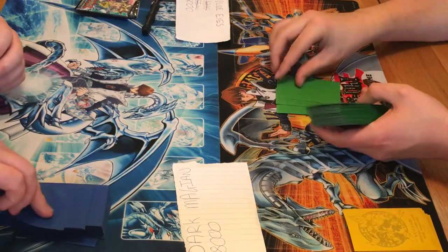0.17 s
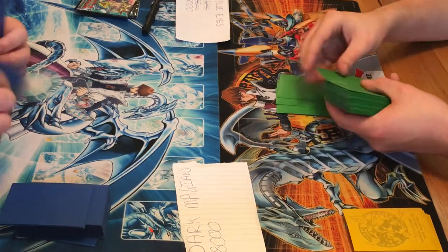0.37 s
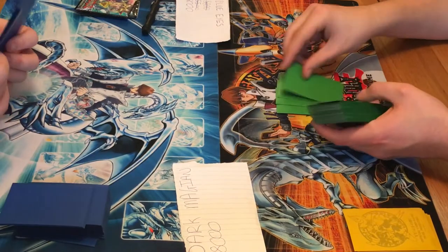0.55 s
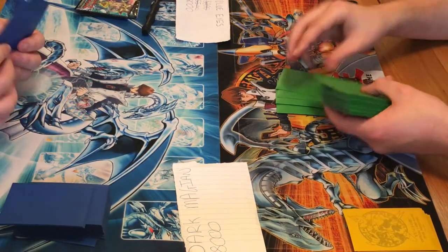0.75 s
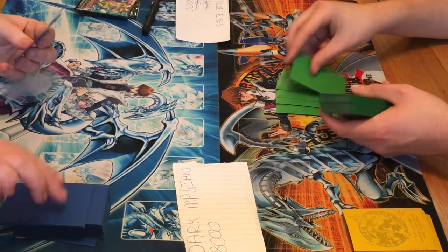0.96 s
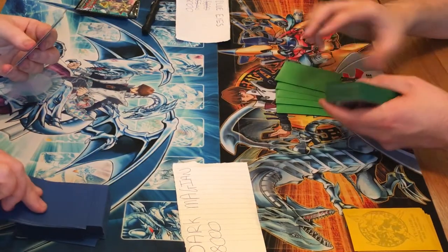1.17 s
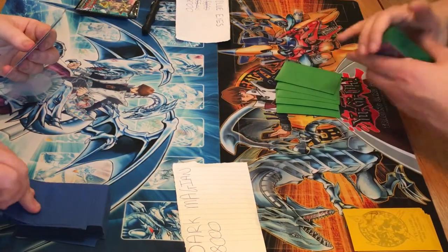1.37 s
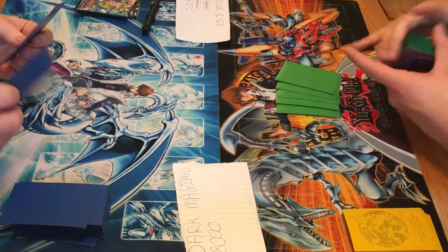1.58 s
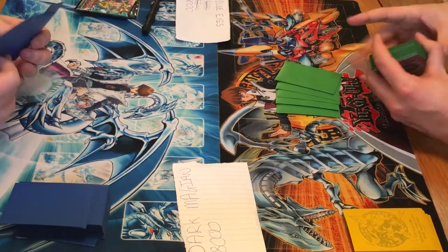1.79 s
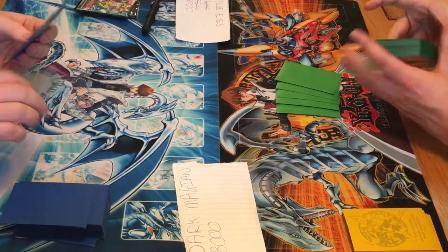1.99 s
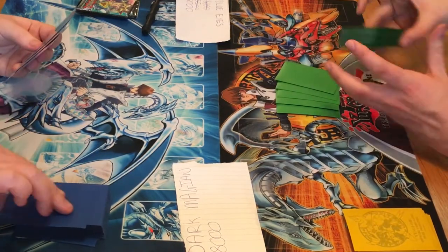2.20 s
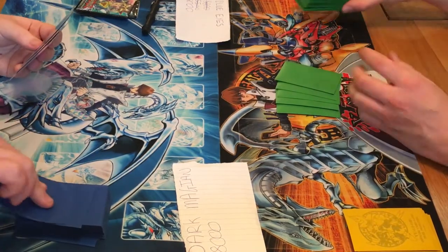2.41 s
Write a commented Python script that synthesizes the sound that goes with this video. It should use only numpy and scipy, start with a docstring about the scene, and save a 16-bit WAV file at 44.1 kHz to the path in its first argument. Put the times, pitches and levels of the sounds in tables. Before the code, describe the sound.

Plastic-sleeved cards slide and snap flat on a mat, sharply at first, then a card is drawn off a pile with a quick zip, followed by faint taps over quiet room noise and low hum.

```python
"""A small live room: sleeved playing cards are dealt onto a cloth mat on a wooden table, one microphone. Cards
slide with grainy friction noise, then touch down and snap flat as smeared pulses with a plastic crackle. Sleeve
edges zip in short bright noise; a short squeak and a drawn card are stick-slip bursts in narrow bands. Low
thuds of the table are damped low modes, over room noise and a wavering hum."""
import sys
import numpy as np
from scipy import signal
from scipy.fft import rfft, irfft, next_fast_len
from scipy.io import wavfile
from scipy.ndimage import map_coordinates

SR = 44100
rng = np.random.default_rng(int(sys.argv[2]) if len(sys.argv) > 2 else 0)


def transcribe(u):
    """Save the signal u as a 16-bit wav file named by the first command-line argument.

    u: samples, shape (n,) or (channels, n), limited to [-1, 1]; the rate is SR.
    q: integer samples, one column per channel.
    """
    v = np.clip(np.atleast_2d(u).T, -1, 1)
    q = np.round(v * 32767).astype(np.int16)
    wavfile.write(sys.argv[1], SR, q)


N = 108045  # length in samples
TOP_HZ = 16100  # upper band limit

# colour of a sleeve rubbing: (frequency [Hz], level [dB])
SLEEVE_HISS = [(1500, -21.5), (4000, -13.5), (5800, -6), (7500, -12), (9500, -1), (10700, -5), (12400, 4.5),
               (14000, -1), (16000, -7.5)]


def amp(db):
    """Decibels to gain."""
    return 10 ** (np.asarray(db) / 20)


def unit(x):
    """Scale to rms 1."""
    return x / np.sqrt(np.mean(x ** 2) + 1e-20)


def along(points, hz):
    """Read (Hz, value) points on a log frequency axis."""
    f, value = np.transpose(points)
    return np.interp(np.log(hz + 1), np.log(f + 1), value)


def filtered(x, response):
    """Multiply the spectrum of x by a response of frequency."""
    size = next_fast_len(len(x) + 8192)
    hz = np.fft.rfftfreq(size, 1 / SR)
    return irfft(rfft(x, size) * response(hz), size)[:len(x)]


def noise(spectrum, size):
    """Coloured noise of rms 1."""
    white = rng.standard_normal(size)
    return unit(filtered(white, lambda hz: amp(along(spectrum, hz))))


def wobble(rate):
    """A smooth random curve, rate knots a second."""
    knots = rng.standard_normal(N // 8)
    return map_coordinates(knots, [np.arange(N) * rate / SR], mode="wrap")


def ring(modes, t):
    """Damped modes struck at t = 0."""
    return sum(amp(db - 60 * t / t60) * np.sin(2 * np.pi * hz * t) for hz, db, t60 in modes)


def add(track, s, x):
    """Mix x into the track at time s."""
    i = max(round(s * SR), 0)
    track[i:i + len(x)] += x[:max(N - i, 0)]


def in_room(x, room_db):
    """The direct sound and a diffuse tail that builds up, then dies faster in the treble."""
    # ringing time of the room: (frequency [Hz], t60 [s])
    room_t60 = [(150, 0.55), (500, 0.38), (1200, 0.38), (3000, 0.38), (7000, 0.33), (14000, 0.26)]
    # colour of the tail: (frequency [Hz], level [dB])
    room_colour = [(100, 0.5), (400, 4.5), (1200, -1), (3000, -1), (5000, -3), (9000, -4.5), (15000, -8)]
    build_s = 0.0046
    hz, t, bins = signal.stft(rng.standard_normal(SR * 2 // 3), SR, nperseg=256)
    decay = amp(-60 * t / along(room_t60, hz)[:, None])
    tail = signal.istft(bins * decay, SR, nperseg=256)[1]
    tail_t = np.arange(len(tail)) / SR
    tail = tail * (1 - np.exp(-(tail_t / build_s) ** 2))
    tail = filtered(tail / np.linalg.norm(tail), lambda f: amp(along(room_colour, f)))
    return x + amp(room_db) * signal.fftconvolve(x, tail)[:len(x)]


def click(parts):
    """One causal pulse from (spectrum, energy dB) parts: bending waves in the card smear it over a few cycles."""
    spread_hz, spread_width_hz = 3270, 1850
    settle_s = 0.0009  # extra delay at TOP_HZ, growing in proportion to frequency
    hz = np.fft.rfftfreq(1024, 1 / SR)
    power = sum((amp(db) * unit(amp(along(spectrum, hz)))) ** 2 for spectrum, db in parts)
    # folding the cepstrum gives minimum phase: the energy comes as early as it can
    cepstrum = irfft(np.log(power) / 2)
    fold = 1 + np.sign(len(cepstrum) // 2 - np.arange(len(cepstrum)))
    fold[0] = 1
    # all-pass phase lag [radians]: delays, but leaves the colour alone
    bending_lag = 2 * np.arctan2(hz * spread_width_hz, spread_hz ** 2 - hz ** 2)
    treble_lag = np.pi * settle_s * hz ** 2 / TOP_HZ
    return irfft(np.exp(rfft(cepstrum * fold) - 1j * (bending_lag + treble_lag)))


def snaps():
    """A bent card springs flat: one pulse of flex and knock, a brief plastic crackle, reflected by the table top."""
    # card edges snapping or tapping down:
    # (time [s], card flex [dB], knock on the mat [dB], sleeve crack [dB], room tail before its colour [dB])
    touches = [(0.1797, -35, -28, -30.5, 8.5), (0.2412, -4.5, -17, -15.5, 0.5),
               (0.5978, -30, -21.5, -26, 4), (0.6576, -15.5, -21, -17.5, -0.5),
               (0.9408, -37.5, -35.5, -42, -1), (1.0388, -34, -30, -30, 0), (1.047, -55, -40, -56, 7),
               (1.0809, -29.5, -18, -20, 0.5), (1.6485, -42, -42, -34, 1), (1.657, -49, -44, -27, -3),
               (1.8041, -48, -36, -40, 2.5), (2.0553, -43.5, -54, -41.5, 0), (2.273, -46, -46.5, -55, 9.5),
               (2.389, -46, -41.5, -44, 11.5)]
    # colours of a bent card, of cards on the mat and of a plastic sleeve: (frequency [Hz], level [dB])
    flex = [(300, -61), (1000, -10), (1900, -3.5), (2550, 1), (3350, 2), (4000, -6), (5200, -16.5),
            (7000, -35), (16000, -51)]
    knock = [(80, -7), (200, -6.5), (450, -8), (1000, -1.5), (1900, -4.5), (3000, -10.5), (6000, -13),
             (16000, -65)]
    crack = [(300, -1), (1500, -5), (4200, -4), (6300, 2), (9000, -0.5), (10300, -4), (13000, 2.5),
             (16000, -1.5)]
    crack_t60_s = 0.014
    edge_db = -1.5  # the sleeve's first sharp contact against its crackle
    bounce_s, bounce_db = 0.0015, -12
    out = np.zeros(N)
    t = np.arange(SR * 2 // 3) / SR
    for s, flex_db, knock_db, crack_db, room_db in touches:
        pulse = click([(flex, flex_db), (knock, knock_db), (crack, crack_db + edge_db)])
        crackle = noise(crack, size=len(t)) * amp(-60 * t / crack_t60_s)
        crackle = crackle / np.linalg.norm(crackle)
        hit = np.pad(pulse, (0, len(t) - len(pulse))) + amp(crack_db) * crackle
        add(out, s, in_room(hit, room_db))
        add(out, s + bounce_s, amp(bounce_db) * hit)
    return out


def stroke(s, rise, fall):
    """Friction of one stroke: it swells exponentially to a peak at s, then fades."""
    t = np.arange(N) / SR
    return np.exp(-np.where(t < s, (s - t) / rise, (t - s) / fall))


def slips():
    """Uneven stick-slip bursts, a gain of rms 1."""
    slips_per_s, slip_db = 230, 4.5
    return unit(amp(slip_db * np.tanh(wobble(slips_per_s))))


def slides():
    """Grainy friction swells as a card speeds up and fades as it comes free; the rasp comes in small rubs."""
    # cards sliding: (time of the peak [s], rise [s], fall [s], sleeve hiss [dB], card rasp [dB])
    strokes = [(.005, 0.014, 0.044, -64.5, -61.5), (0.096, 0.0068, 0.017, -60, -60),
               (0.154, 0.027, 0.025, -63, -58), (0.235, 0.012, 0.03, -49, -49.5),
               (0.389, 0.018, 0.0055, -43.5, -56), (0.508, 0.026, 0.018, -60.5, -60),
               (.558, 0.009, 0.012, -53.5, -57), (0.641, 0.049, 0.017, -59.5, -53),
               (0.739, 0.012, 0.009, -58, -52.5), (0.849, 0.022, 0.036, -65, -62.5),
               (0.96, 0.016, 0.026, -59, -55), (1.043, 0.0092, 0.021, -60, -55),
               (1.325, 0.059, 0.023, -65.5, -91), (1.404, 0.018, 0.019, -63, -61.5),
               (1.502, 0.033, 0.016, -64, -76), (1.577, 0.021, 0.0059, -45, -56),
               (1.657, 0.029, 0.018, -55.5, -64), (1.910, .04, 0.051, -68.5, -79.5),
               (2.289, 0.022, 0.0083, -80, -66), (2.415, 0.022, 0.056, -68, -69)]
    # colour of card on card: (frequency [Hz], level [dB])
    card_rasp = [(150, -3), (600, -10.5), (1300, -2), (2500, -1.5), (4200, -8), (7500, -9.5),
                 (16000, -17.5)]
    grains_per_s, grain_db, room_db = 450, 2, -2
    hiss_level, rasp_level = np.zeros(N), np.zeros(N)
    for s, rise, fall, hiss_db, rasp_db in strokes:
        speed = stroke(s, rise, fall)
        hiss_level += amp(hiss_db) * speed
        rasp_level += amp(rasp_db) * speed
    grain = unit(amp(grain_db * np.tanh(wobble(grains_per_s))))
    hiss = hiss_level * noise(SLEEVE_HISS, size=N)
    rasp = rasp_level * slips() * noise(card_rasp, size=N)
    return in_room(grain * (hiss + rasp), room_db)


def zips():
    """A sleeve edge zips past another: very short bright scrapes of noise."""
    # edges passing: (time [s], level [dB])
    edges = [(0.2356, -46), (0.238, -42), (0.6555, -37), (0.742, -45), (1.025, -53.5), (1.0758, -33.5),
             (1.4897, -39.5)]
    width_s, room_db = 0.0014, -0.5
    t = np.arange(N) / SR
    level = sum(amp(db) * np.exp(-((t - s) / width_s) ** 2) for s, db in edges)
    return in_room(level * noise(SLEEVE_HISS, size=N), room_db)


def squeak_and_draw():
    """A short squeak, then a card pulled off the pile: stick-slip bursts of noise, each in its own band."""
    # a short squeak, then a card scraped off the pile, ringing its sleeve:
    # (time of the peak [s], rise [s], fall [s], resonance [Hz], width [Hz], level [dB])
    scrapes = [(1.413, 0.0027, .002, 5500, 1200, -51), (1.558, 0.015, 0.01, 2690, 1800, -52),
               (1.579, 0.0098, 0.0023, 4550, 1800, -51.5), (1.572, 0.017, 0.0025, 11900, 1700, -42)]
    room_db = -6.5
    out = np.zeros(N)
    for s, rise, fall, hz, width_hz, db in scrapes:
        white = rng.standard_normal(N)
        band = filtered(white, lambda f: 1 / (1 + ((f - hz) / width_hz * 2) ** 2))
        out += amp(db) * stroke(s, rise, fall) * slips() * unit(band)
    return in_room(out, room_db)


def table_thuds():
    """Low thuds of the table: damped low modes with a softened onset."""
    # low thuds of the table: (time [s], level [dB])
    thuds = [(0.244, -50), (0.601, -50), (.735, -57.5), (1.08, -45.5), (1.584, -54), (1.802, -63),
             (1.968, -58), (2.274, -57)]
    # low modes: (frequency [Hz], level [dB], t60 [s])
    table_modes = [(49.7, -19, 0.26), (103, 3, 0.25), (131.9, -4, 0.83), (176, -0.5, 0.23),
                   (239.3, -9, 0.29)]
    attack_s = 0.0027
    out = np.zeros(N)
    t = np.arange(SR) / SR
    for s, db in thuds:
        add(out, s, amp(db) * ring(table_modes, t) * (1 - np.exp(-t / attack_s)))
    return out


def background():
    """Steady coloured room noise, and a low sine hum that wavers in level and phase."""
    # colour of the room noise: (frequency [Hz], level [dB])
    room_noise = [(20, -47), (30, -18), (41, 1.5), (55, -7.5), (85, -6), (135, -6.5), (230, -16),
                  (800, -26), (1600, -29.5), (5000, -36), (10000, -35), (12500, -31.5), (16000, -33)]
    floor_db = -62.5
    hum_hz, hum_db, waver_db = 100.7, -62, 2.5
    drift = 0.65  # radians
    phase = 2 * np.pi * hum_hz * np.arange(N) / SR + drift * wobble(27)
    hum = unit(np.sin(phase) * amp(waver_db * wobble(7.5)))
    return amp(hum_db) * hum + amp(floor_db) * noise(room_noise, size=N)


def scene():
    """All sources at one microphone."""
    cards = snaps() + slides() + zips() + squeak_and_draw()
    return (cards + table_thuds() + background())[None]


def record(dry):
    """Nothing is kept above the band limit."""
    return np.array([filtered(x, lambda hz: hz < TOP_HZ) for x in dry])


dry = scene()
out = record(dry)
transcribe(out)
```